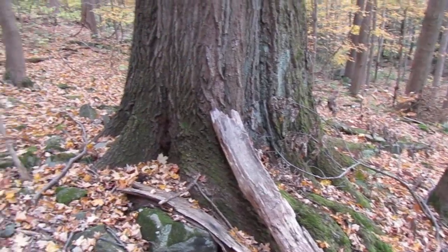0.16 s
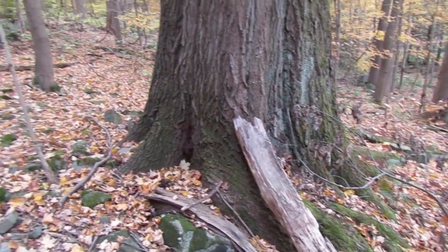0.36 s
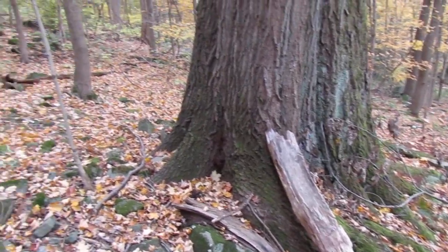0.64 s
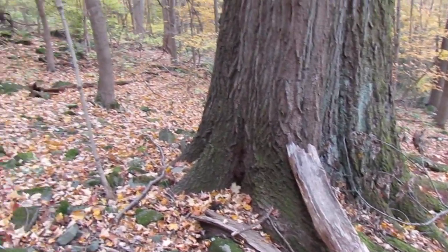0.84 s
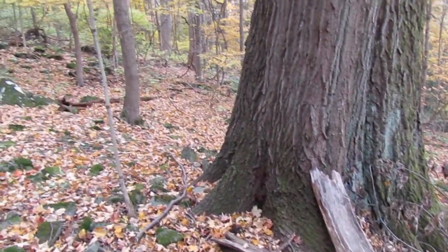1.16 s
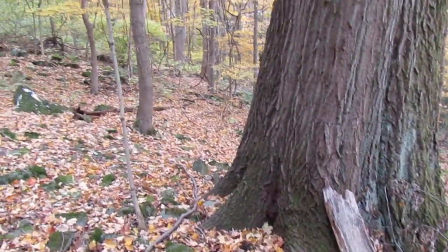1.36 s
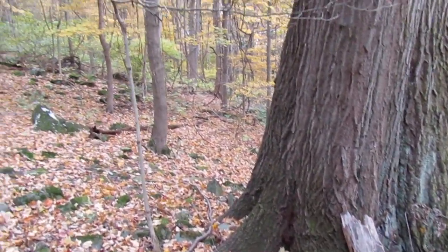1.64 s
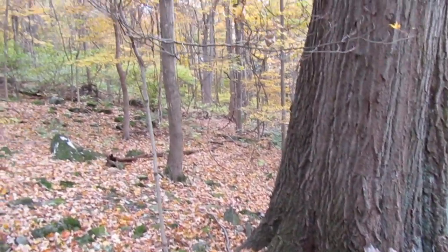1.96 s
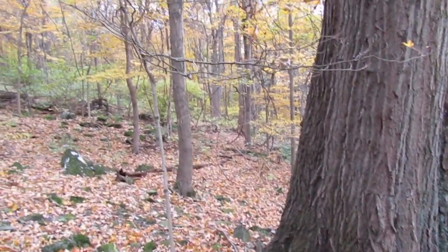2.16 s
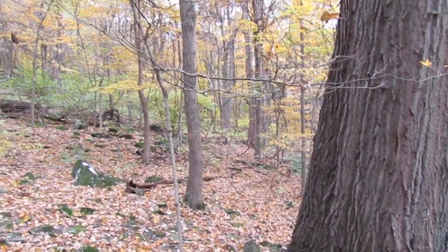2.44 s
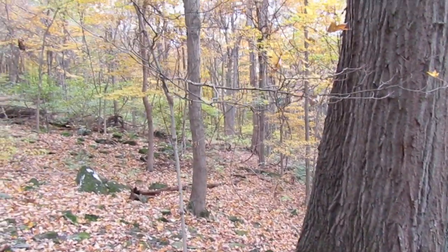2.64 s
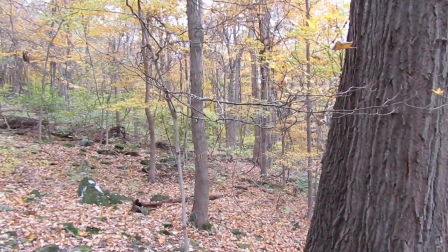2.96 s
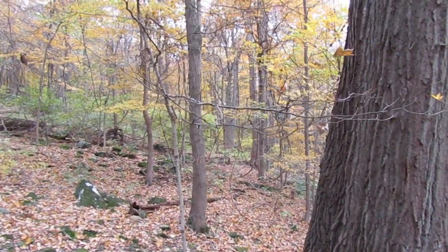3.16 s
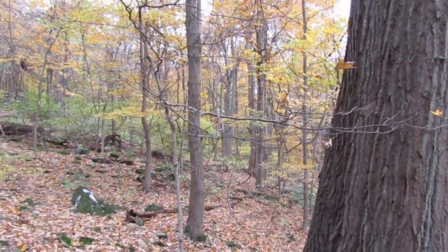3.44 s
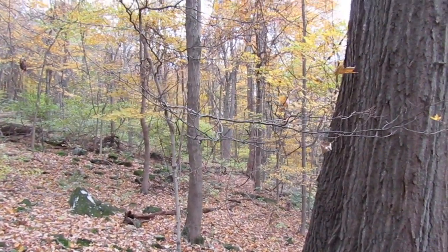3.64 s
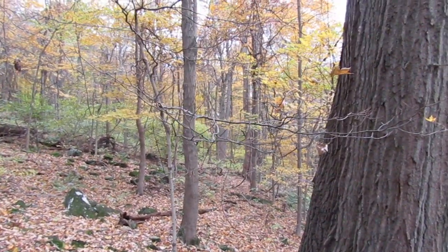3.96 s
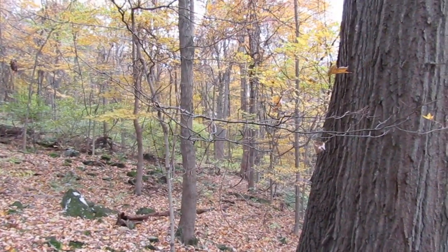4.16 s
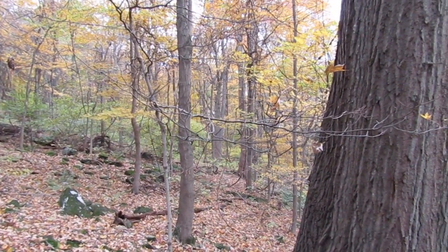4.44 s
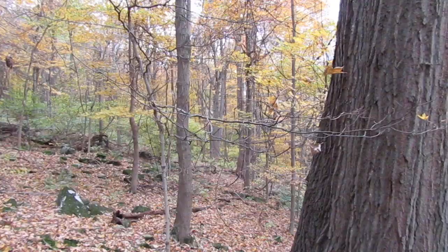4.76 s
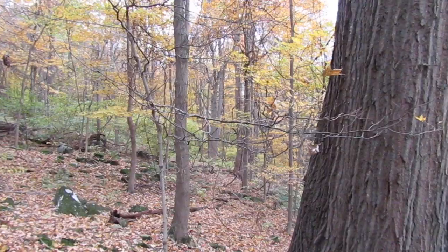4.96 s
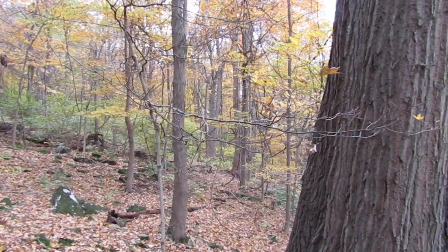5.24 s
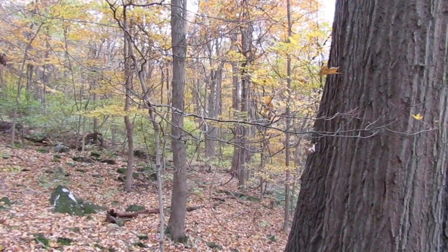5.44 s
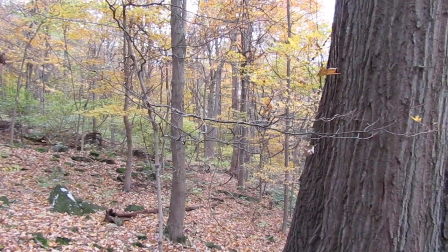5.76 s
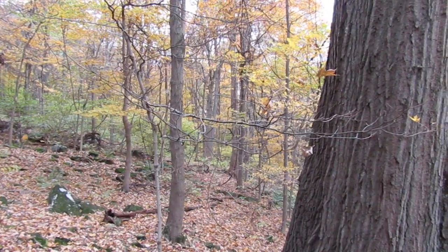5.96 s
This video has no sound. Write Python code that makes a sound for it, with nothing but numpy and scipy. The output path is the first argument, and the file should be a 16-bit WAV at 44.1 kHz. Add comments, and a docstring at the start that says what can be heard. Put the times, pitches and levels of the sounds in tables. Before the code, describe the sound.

A steady, soft woodland hiss with a faint low camera hum and a very thin high whine runs throughout. After nearly three seconds, small dry twigs tick sparsely, then more thickly with faint leaf rustle. Past five seconds a shoe lands with a dull thud and a stick cracks sharply close to the handheld microphone, followed by a few more snaps. Short, thin outdoor echo.

```python
"""Dry twigs and leaf stalks tick and snap as someone shifts their footing on a wooded slope.
A step lands with a thud, the litter rustles and a stick breaks close by: bursts of noise ring each body.
Under this lie the steady hiss of the forest, made of coloured noise, and a camera's faint hum and whine.
Bumps of the hand rumble; the camera's gain control ducks after the break and recovers slowly."""
import sys
import numpy as np
from scipy import signal
from scipy.fft import rfft, irfft, next_fast_len
from scipy.io import wavfile

SR = 44100
rng = np.random.default_rng(int(sys.argv[2]) if len(sys.argv) > 2 else 0)


def generate_wav(sig):
    """Save sig (samples, or channels by samples) to the path in sys.argv[1] as 16-bit PCM at SR."""
    pcm = np.round(np.clip(np.atleast_2d(sig).T, -1, 1) * 32767).astype(np.int16)
    wavfile.write(sys.argv[1], SR, pcm)


N = 268877  # length of the scene in samples

# Snapping twigs and stalks: start_s [s], level_db [dB], crumble_s [s], ring_hz [Hz], ring_db [dB],
# body_db [dB], brightness_db [dB]
TWIG_SNAPS = [ (2.7065, -38, .0018, 950, 5, 7, -12), (2.71, -30.5, .0045, 3600, 5, 1, -9),
              (2.7200, -35.5, .0008, 10000, 13, 4, 9), (2.7215, -34, .005, 900, 7, 11, -2),
              (3.2816, -27, 0.00095, 5900, 11, 7, 0.5), (3.4450, -39, .0015, 12500, 1, -14, -2),
              (3.8910, -38, .003, 8000, 3, -8, 0), (4.1257, -31.5, 0.01, 5700, 5, -6, -9),
              (4.3350, -32.5, 0.0045, 4450, 2, -13, -9), (4.3615, -29.5, .0024, 4400, 3, 9, 4),
              (4.4040, -31.5, .0049, 5900, 3, -1, -4), (4.4617, -35.5, 0.0027, 12500, 10, -6, 1),
              (4.6324, -30.5, .002, 6000, 9, -3, -4), (4.6354, -28.5, .0012, 3300, 17, 3, -2),
              (5.0130, -35.5, .0012, 5600, 14, -9, 3), (5.3367, -25.5, 0.0026, 5900, 5, -5, -1),
              (5.339, -23, 0.0049, 1350, 5, 1, -6), (5.3400, -23.5, 0.0052, 5950, 13, 6, -1),
              (5.4566, -23, 0.00092, 2300, 8, -4, -4), (5.4597, -20.5, 0.0054, 1160, 8, 4, 1),
              (5.6830, -23.5, 0.0011, 2130, 3, 4, -9), (5.909, -37, .006, 4450, 7, -5, -9),
              (6.0725, -19.5, 0.00088, 4400, 11, -7, -12), (6.0750, -27, .0048, 1690, 19, 3, 5)]
# Colour shared by all dry twigs: pitch_hz [Hz], level_db [dB]
DRY_WOOD_COLOUR = [(60, -25), (250, -6), (600, -5.5), (1100, -1), (1600, 0), (2500, 0), (5500, -0.5),
                   (8000, -4), (12000, -9), (16000, -22.5)]
# The breaking stick, before its band filter: start_s [s], level_db [dB], crumble_s [s]
STICK_BREAK = (5.4576, -10, 0.00033)
# Resonances of the stick: pitch_hz [Hz], width_hz [Hz], level_db [dB]
STICK_MODES = [(920, 200, -1.5), (1230, 180, 1.5), (2190, 310, 3), (2660, 360, 4), (4130, 310, -8),
               (5270, 860, 10), (6470, 450, -11), (7500, 690, -8), (9200, 650, -16), (12100, 1000, -6)]
# The footfall: start_s [s], level_db [dB], crumble_s [s]
FOOTFALL = (5.3413, -19, 0.0014)
# Resonances of a shoe on soft ground: pitch_hz [Hz], width_hz [Hz], level_db [dB]
GROUND_MODES = [(172, 45, -3), (320, 120, -11), (460, 69, -1.5), (820, 110, -7), (1140, 190, -14),
                (1420, 180, -21)]
# The sole pressing the leaves: fullest_pressure_s [s], level_db [dB], swell_s [s]
LEAF_PRESSES = [(3.9, -52, .03), (4.425, -42, 0.055), (4.65, -45, 0.017), (5.345, -35, .005),
                (5.42, -40.5, .03), (5.545, -40, 0.05), (6.085, -38, .008)]
# Colour of the leaf litter: pitch_hz [Hz], level_db [dB]
LEAF_COLOUR = [(200, -23), (1000, -7), (3000, -2), (6000, 1.5), (8500, -1), (12000, -8), (16000, -22)]
# Level of the forest hiss over time: time_s [s], level_db [dB]
HISS_LEVEL = [(0, -42), (.6, -41), (4.4, -41), (5.3, -41.5), (6.1, -40.6)]
# Colour of the forest hiss: pitch_hz [Hz], level_db [dB]
HISS_COLOUR = [(20, -16), (50, -4.5), (100, 0), (200, 1), (300, -2.5), (750, -2), (1700, -6.5),
               (2900, -5.5), (5200, -5), (7000, -9), (9500, -12.5), (12000, -18.5), (14000, -28),
               (16000, -38)]
# Level of the camera's low hum over time: time_s [s], level_db [dB]
HUM_LEVEL = [(0, -57), (2.2, -52.5), (4.0, -57.5), (5.0, -54.5), (6.1, -67)]
# Colour of the hum: pitch_hz [Hz], level_db [dB]
HUM_COLOUR = [(110, -42), (160, -10.5), (182, -9), (189, -2), (198, -7), (230, -14.5), (300, -44),
              (3000, -86)]
# The hand bumping the camera: peak_s [s], level_db [dB]
HAND_BUMPS = [(4.845, -49), (4.965, -47), (5.095, -46), (5.18, -54), (5.25, -54), (5.335, -47), (5.45, -54)]
# Colour of the handling rumble: pitch_hz [Hz], level_db [dB]
RUMBLE_COLOUR = [(15, -17), (40, -3), (90, -13), (200, -17.5), (600, -34), (3000, -85)]

GRAIN = 8192  # length of one short sound in samples
GAP_SHARE, GAP_TOP_HZ = 0.56, 1950  # a dip below each twig's ring: share of its ring pitch, and a ceiling
SETTLE_S = 0.044  # the leaves settle after each press
WHINE_HZ, WHINE_DB = 11795, -70.5
BUMP_SWELL_S, BUMP_FADE_S = 0.015, 0.023
GRIP_DB = -64.5  # steady rumble of the holding hand
CUTOFF_HZ = 15800  # the final filter removes what lies above


def twigs(ring_octaves=0.095, gap_octaves=0.28, gap_db=10, body_hz=1500, bright_hz=8000):
    """Each snapping twig has its own ring, a dip in level below it, and its own bass and treble."""
    out = np.zeros(N)
    hz = bins(GRAIN)
    wood = shape(DRY_WOOD_COLOUR, GRAIN)
    for start_s, level_db, crumble_s, ring_hz, ring_db, body_db, bright_db in TWIG_SNAPS:
        ring = ring_db / (1 + (np.log2(hz / ring_hz) / ring_octaves) ** 2)
        gap_hz = min(GAP_SHARE * ring_hz, GAP_TOP_HZ)
        gap = gap_db / (1 + (np.log2(hz / gap_hz) / gap_octaves) ** 2)
        # thick twigs have more body, thin ones more treble
        body = body_db / (1 + (hz / body_hz) ** 4)
        brightness = bright_db / (1 + (bright_hz / hz) ** 4)
        snap = fracture(crumble_s, first=0.29)
        add(out, start_s, level_db, colour(snap, wood + ring - gap + body + brightness))
    return out


def stick(radiating_hz=650, bluntness_hz=11000):
    """The break rings the stick, too thin to radiate bass; its fibres tear in finite time, dulling the top."""
    crack = blow(STICK_BREAK, STICK_MODES, first=4.1)
    band = signal.butter(2, [radiating_hz, bluntness_hz], "band", fs=SR, output="sos")
    return signal.sosfilt(band, crack)


def footstep():
    """The shoe lands and sets the low resonances of the soft ground ringing: a thud."""
    return blow(FOOTFALL, GROUND_MODES, first=0.76)


def leaves():
    """Each press of the sole crackles through the litter, which then settles."""
    pressure = sum(swell(s, db, swell_s, SETTLE_S) for s, db, swell_s in LEAF_PRESSES)
    return pressure * noise(LEAF_COLOUR, grain_db=3.5)


def forest_echo(x, near_db=-10, near_s=0.013, far_db=-21, far_s=0.044, delay_s=0.00334):
    """Ground and trunks scatter a sound into a short, thin tail of dying noise."""
    t = np.arange(2 * GRAIN) / SR
    echo = np.zeros(len(t))
    for db, decay_s in ((near_db, near_s), (far_db, far_s)):
        tail = rng.standard_normal(len(t)) * np.exp(-t / decay_s)
        tail *= t > delay_s  # the first reflection takes time to arrive
        echo += from_db(db) * tail / np.linalg.norm(tail)
    return signal.fftconvolve(x, echo)[:N]


def forest_hiss():
    """Coloured noise whose level drifts a little makes the steady hiss of the forest."""
    return gain_curve(HISS_LEVEL) * noise(HISS_COLOUR)


def camera(waver_db=2.5, waver_rad=0.9):
    """A lumpy hum of narrow noise, a thin wavering whine and the rumble of the holding hand."""
    hum = gain_curve(HUM_LEVEL) * noise(HUM_COLOUR)
    phase = 2 * np.pi * WHINE_HZ * np.arange(N) / SR + waver_rad * drift(12)
    whine_gain = from_db(WHINE_DB + waver_db * drift(14))
    whine = whine_gain * np.sqrt(2) * np.sin(phase)
    bumps = sum(swell(s, db, BUMP_SWELL_S, BUMP_FADE_S) for s, db in HAND_BUMPS)
    handling = (from_db(GRIP_DB) + bumps) * noise(RUMBLE_COLOUR)
    return hum + whine + handling


def fracture(crumble_s, first=0.6, grain_db=2.5):
    """One fibre gives way, then a dying shower of smaller ones."""
    t = np.arange(GRAIN) / SR
    sizes = from_db(grain_db * np.minimum(rng.exponential(1, GRAIN), 4))
    shower = rng.standard_normal(GRAIN) * sizes * np.exp(-t / crumble_s)
    shower /= np.linalg.norm(shower)
    shower[0] = first
    return shower


def resonate(force, modes):
    """The force rings several damped resonances side by side; a wider one dies sooner."""
    out = np.zeros(GRAIN)
    for hz, width_hz, db in modes:
        r = np.exp(-np.pi * width_hz / SR)
        feed = np.array([1, 0, -1]) * (1 - r * r) / 2
        feedback = [1, -2 * r * np.cos(2 * np.pi * hz / SR), r * r]
        out += from_db(db) * signal.lfilter(feed, feedback, force)
    return out


def blow(event, modes, first):
    """A single fracture sets a body ringing."""
    start_s, level_db, crumble_s = event
    out = np.zeros(N)
    add(out, start_s, level_db, resonate(fracture(crumble_s, first), modes))
    return out


def swell(peak_s, level_db, swell_s, fade_s):
    """A gain that builds smoothly to its peak, then dies away."""
    t = np.arange(N) / SR - peak_s
    rise = (np.minimum(t, 0) / swell_s) ** 2
    fall = np.maximum(t, 0) / fade_s
    return from_db(level_db) * np.exp(-rise - fall)


def add(out, start_s, level_db, sound):
    """Place a short sound; its level is its energy spread over 4 ms."""
    at = int(start_s * SR)
    sound = sound * from_db(level_db) * np.sqrt(0.004 * SR / np.sum(sound ** 2))
    out[at:at + GRAIN] += sound[:N - at]


def noise(points, grain_db=0):
    """Coloured noise of rms 1; uneven grain sizes make it crackle."""
    sizes = from_db(grain_db * np.minimum(rng.exponential(1, N), 6))
    size = 2 * next_fast_len(N // 2 + GRAIN)
    return rms_one(colour(rng.standard_normal(N) * sizes, shape(points, size)))


def drift(rate):
    """Slow random wander of spread about 1, with `rate` random points per second."""
    knots = rng.standard_normal(1000)
    return np.interp(np.arange(N) / SR * rate, np.arange(len(knots)), knots)


def colour(x, db):
    """Minimum-phase filter with the given dB per frequency: nothing sounds before its cause."""
    size = 2 * (len(db) - 1)
    cepstrum = irfft(np.log(from_db(db)))
    # fold the backward half of the response onto the forward half
    cepstrum[1:size // 2] *= 2
    cepstrum[size // 2 + 1:] = 0
    return irfft(rfft(x, size) * np.exp(rfft(cepstrum)))[:len(x)]


def shape(points, size):
    """Rows of (Hz, dB) joined on a log-frequency axis."""
    hz, db = np.transpose(points)
    return np.interp(np.log(bins(size)), np.log(hz), db)


def bins(size):
    """Frequencies of a spectrum in Hz, kept above zero."""
    return np.maximum(np.fft.rfftfreq(size, 1 / SR), 1)


def gain_curve(rows):
    """Rows of (s, dB) as a gain per sample."""
    return from_db(np.interp(np.arange(N) / SR, *np.transpose(rows)))


def rms_one(x):
    """Scale to rms 1."""
    return x / np.sqrt(np.mean(x ** 2) + 1e-20)


def from_db(db):
    """Decibels to gain."""
    return 10 ** (np.asarray(db) / 20)


def scene(close_wet_db=-9):
    """All sources reach one microphone; the stick and the step, close by, echo least."""
    ticks = twigs()
    close = stick() + footstep()
    echo = forest_echo(ticks + from_db(close_wet_db) * close)
    mono = ticks + close + echo + leaves() + forest_hiss() + camera()
    return np.array([mono, mono])


def gain_control(x, threshold_db=-6, depth_db=4.0, release_db_per_s=2.5, attack_s=0.0018):
    """A loud peak quickly pulls the gain down; it creeps back up."""
    peak_db = 20 * np.log10(np.abs(x).max(axis=0) + 1e-9)
    over = np.clip(peak_db - threshold_db, 0, depth_db)
    # hold the largest cut so far, letting it shrink at the release rate
    creep = release_db_per_s * np.arange(N) / SR
    held = np.maximum.accumulate(over + creep) - creep
    r = np.exp(-1 / (attack_s * SR))
    cut_db = signal.lfilter([1 - r], [1, -r], held)
    return x * from_db(-cut_db)


def record(dry):
    """Gain control, then peaks beyond full scale are flattened, then the top is cut."""
    limited = np.clip(gain_control(dry), -1, 1)
    low_pass = signal.ellip(10, 0.2, 80, CUTOFF_HZ, fs=SR, output="sos")
    return signal.sosfilt(low_pass, limited)


dry = scene()
out = record(dry)
generate_wav(out)
```